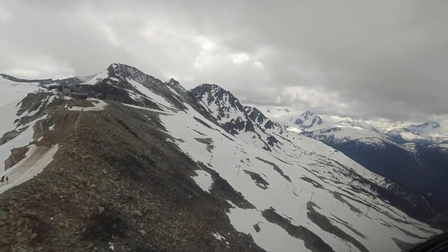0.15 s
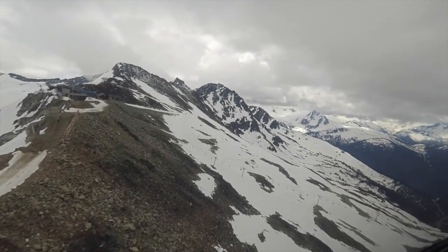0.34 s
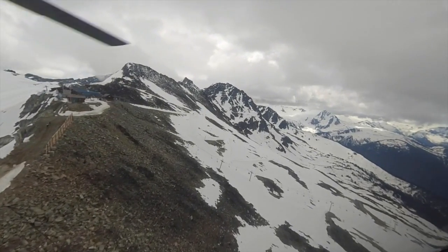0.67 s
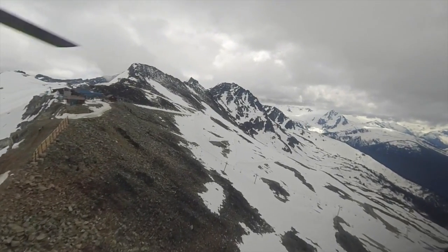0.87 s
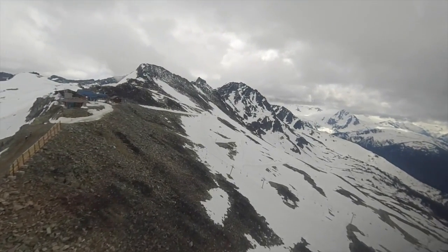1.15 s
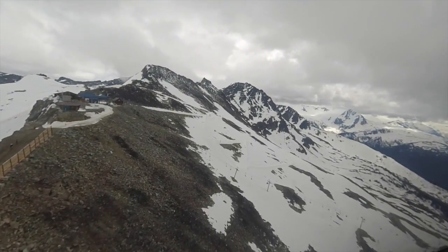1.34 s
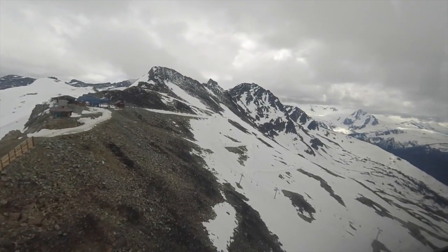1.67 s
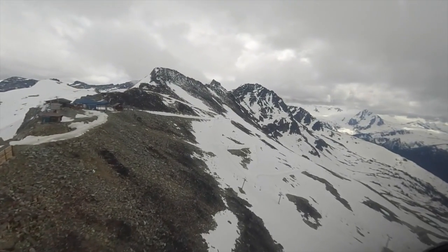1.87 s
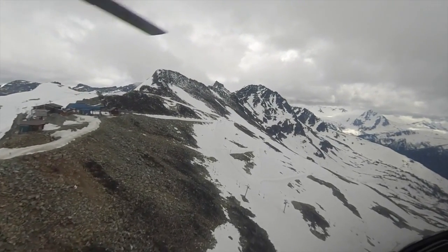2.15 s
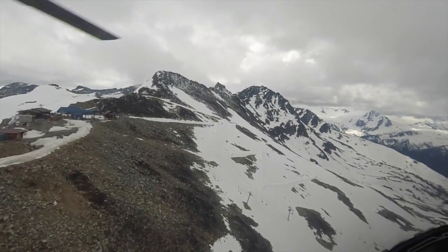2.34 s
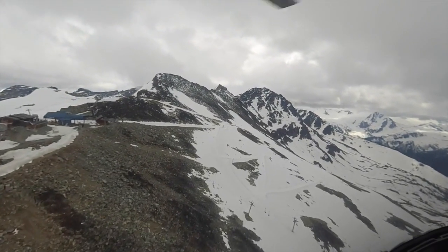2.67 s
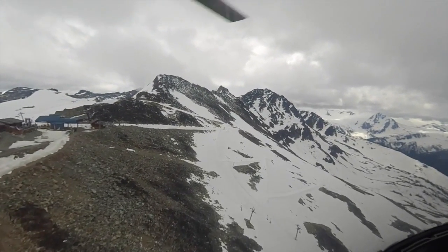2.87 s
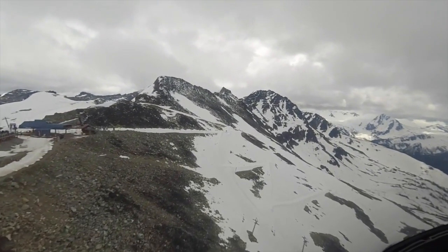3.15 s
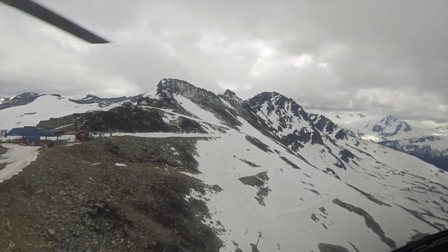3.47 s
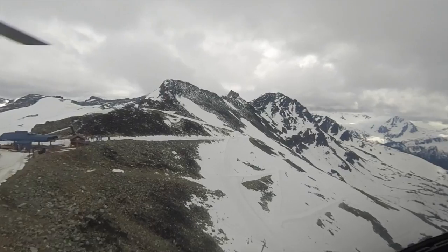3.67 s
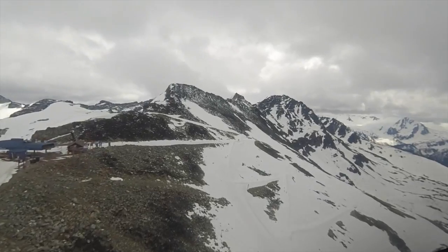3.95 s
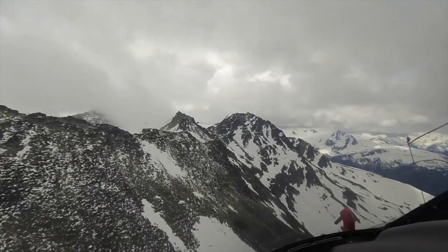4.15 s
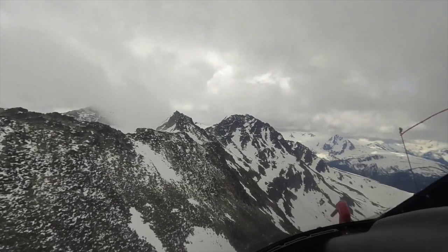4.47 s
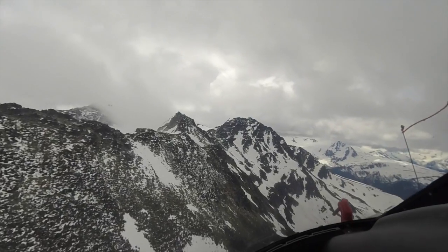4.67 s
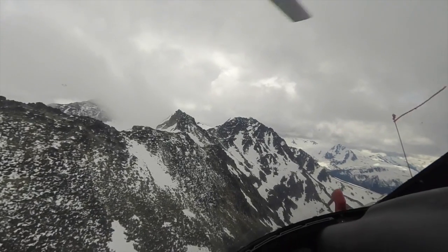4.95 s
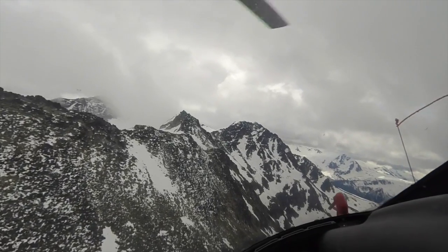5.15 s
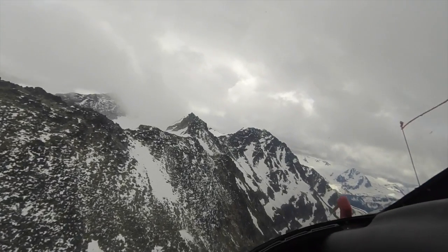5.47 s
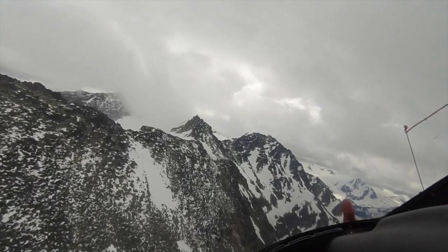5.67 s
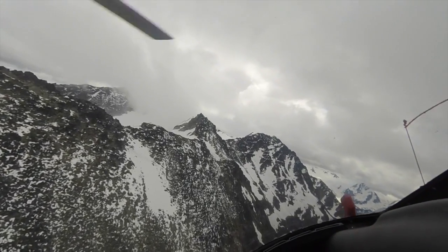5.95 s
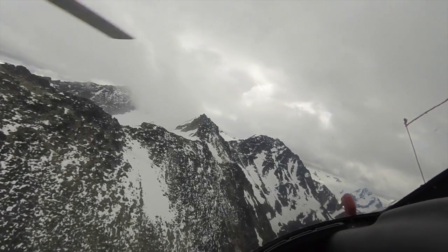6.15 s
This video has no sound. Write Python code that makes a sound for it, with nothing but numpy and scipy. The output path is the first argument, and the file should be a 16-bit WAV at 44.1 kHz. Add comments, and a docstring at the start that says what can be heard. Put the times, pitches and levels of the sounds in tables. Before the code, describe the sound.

A single microphone on a mount in a helicopter cockpit picks up constant bassy rumble, buzzing drone and thin, wavering mechanical whines. A sudden overloaded clack with two quick, weaker rebounds breaks the steadiness, followed by a barely audible high whistle. After a soft edit click the same cabin sounds fuller and more strained: stronger low throbbing, thicker roar and a midrange whine, continuing until the end without fading.

```python
"""Inside a helicopter cabin, cruising over a ridge, one microphone hears the main rotor throb, the tail rotor
drone and the gears whine over a roar of noise coloured by the cabin.
At 1.7 s something knocks hard on the camera mount and bounces twice, overloading the microphone; a faint
thin whistle then swells and sinks.
At 4.1 s an edit with a small click jumps to a later stretch of flight, where the rotor works harder."""
import sys
import numpy as np
from scipy import signal
from scipy.fft import rfft, irfft
from scipy.io import wavfile

SR = 44100
rng = np.random.default_rng(int(sys.argv[2]) if len(sys.argv) > 2 else 0)


def persist_wave(psi):
    """Save psi, clipped to +-1, as 16-bit WAV."""
    counts = np.round(np.clip(psi, -1, 1) * 32767).astype(np.int16)
    wavfile.write(sys.argv[1], SR, np.atleast_2d(counts).T)


N = 277659
TIME = np.arange(N) / SR   # s
CUT_S = 4.1453
LATER = np.clip((TIME - CUT_S) * 1000, 0, 1)   # 0 before the edit, 1 after it, over 1 ms

# Main rotor, three blades. Each row: multiple of the shaft rate, level before the edit in dB, after it in dB.
MAIN_ROTOR = [(1, -44.5, -56), (3, -32.5, -24.5), (6, -43.5, -38), (9, -50.5, -49.5), (12, -55, -60),
              (15, -56.5, -53), (18, -56, -54)]
# Tail rotor. Each row: multiple of the blade rate, level before the edit in dB, after it in dB.
TAIL_ROTOR = [(1, -37, -37.5), (2, -42, -41.5), (3, -45.5, -47.5), (4, -67.5, -75.5), (5, -66.5, -97)]
# Pitch of the fast input gear, pacing the whole drive train. Each row: time in seconds, pitch in Hz.
INPUT_GEAR_PITCH = [(0, 1733.9), (1.1, 1733.2), (2.2, 1728.1), (4.1, 1732.9), (4.2, 1739.2), (5.15, 1744.5),
                    (6.3, 1738.3)]
# Whine of the input gear. Each row: time in seconds, level in dB.
INPUT_GEAR_LEVEL = [(0.0, -55.0), (1.2, -53.5), (1.3, -62.5), (1.4, -63.5), (1.6, -52.5), (3.5, -55),
                    (3.8, -49.5), (4.1, -58.5), (5.1, -49), (5.2, -52.5), (6.3, -51.0)]
# Gear mesh harmonics that swell and fade slowly. Each row: multiple of the mesh rate, level before the edit
# in dB, after it in dB, swing in dB, period in seconds, time of a crest in seconds.
MESH_HARMONICS = [(1, -54.5, -55.5, .5, 1.21, 0.71), (4, -71.5, -64.5, 4, 4.25, 3.46),
                  (6, -71, -73.5, 3.5, 1.75, 1.36)]
# Second mesh harmonic. Each row: time in seconds, level in dB.
OCTAVE_LEVEL = [(0, -53.5), (0.45, -60.0), (1.0, -69), (1.9, -66.5), (2.25, -54), (3.05, -59), (3.4, -67),
                (4.0, -63.5), (4.2, -53.5), (4.8, -57), (5.15, -65), (5.8, -57), (6.3, -56.5)]
# Fifth mesh harmonic, the shrill one. Each row: time in seconds, level in dB.
SHRILL_LEVEL = [(0.0, -56.5), (0.8, -65.5), (1.3, -62.5), (1.4, -87), (1.6, -62.5), (2.0, -67.5),
                (2.2, -59.5), (2.7, -64.5), (3.9, -59), (4.1, -72), (4.7, -66), (5.8, -77), (6.3, -62)]
# Faint gear and turbine tones. Each row: pitch at cruising speed in Hz, level before the edit in dB,
# after it in dB.
FAINT_TONES = [(707, -66, -67), (1555, -65, -76), (1963.5, -79, -71.5), (3550, -91, -87),
               (4560, -78, -76.5), (5236, -85.5, -86), (5573, -91.5, -101), (5892, -89, -96),
               (6730, -100, -102), (7866, -99, -105), (9100, -101, -105), (10930, -100, -101)]
# Turbine shaft harmonics. Each row: multiple of the shaft rate, level in dB.
TURBINE_HARMONICS = [(11, -96), (13, -100), (15, -96), (17, -99), (21, -101), (23, -101), (25, -103)]
# Turbine whine under load, heard after the edit. Each row: time in seconds, pitch in Hz, level in dB.
LOAD_WHINE = [(4.15, 1034, -49.0), (4.5, 1041, -51.9), (5.2, 1033, -48.1), (5.9, 1027, -52.6),
              (6.3, 1019, -65.1)]
# Knocks on the mount. Each row: time in seconds, signed thump gain, clack in dB, contact softness (low-pass
# corner) in Hz, rattle in dB.
KNOCKS = [(1.71, -1.09, 1, 2340, -14.5), (1.7345, 0.22, -27, 696, -38), (1.7647, 0.43, -11, 900, -35)]
# Slow sway of the mount. One row: pitch in Hz, level in dB, 60 dB decay time in seconds.
MOUNT_SWAY = (144.6, 2.8, 0.053)
# Modes of the housing. Each row: pitch in Hz, level in dB, 60 dB decay time in seconds.
HOUSING_MODES = [(241, -11, 0.053), (397, -30, 0.18), (609.5, -15, 0.093), (775, -11.5, 0.038),
                 (1040, -2, 0.02), (1153, -5.5, 0.015), (1357, -2, 0.012), (2050, -11, 0.0047),
                 (3000, -7, 0.0046)]
# Air and exhaust through the cabin walls. Each row: frequency in Hz, relative density in dB per Hz.
ROAR_SPECTRUM = [(10, 5), (30, -9.5), (52, -10), (100, -9.5), (180, -19), (280, -24), (480, -27.5),
                 (800, -34), (1300, -36.5), (1700, -35), (2200, -48.5), (4300, -47.5), (5100, -60),
                 (7000, -65.5), (14500, -71.5)]
# Cabin air and panel resonances. Each row: centre in Hz, width in Hz, lift before the edit in dB,
# after it in dB.
CABIN_RESONANCES = [(526, 44, -1, 9), (1008, 72, 8, 9), (3315, 174, 8.5, 8), (10770, 1200, 4, 5.5)]
# Extra roar under load, after the edit. Each row: frequency in Hz, lift in dB.
LOAD_LIFT = [(15, 4.5), (50, 3), (110, 4), (500, 1), (1500, 3), (3000, 3), (8000, 2), (14000, 0)]

# Drive train: ratios of the mesh rate to the main shaft and tail blade rates, and of the input gear to it
MESH_PER_TURN, MESH_PER_TAIL_BLADE, WHINE_PER_MESH = 100.6, 9.43, 2.6425
CRUISE_MESH_HZ = 654.5
# Each turn of the main shaft rocks the gear mesh: swing of level (share) and of phase (radians)
TURN_DEPTH, TURN_WOBBLE = 0.059, 0.19
TURBINE_HZ = 576   # shaft rate
# A thin whistle swells once out of its resting level, holds and sinks back
WHISTLE_HZ, WHISTLE_REST_DB, WHISTLE_SWELL_DB = 5202, -89.5, 8.5
WHISTLE_START_S, WHISTLE_ATTACK_S, WHISTLE_HOLD_S, WHISTLE_RELEASE_S = 1.8, .2, 1.0, .35
OVERLOAD_KNEE = 9.7   # the higher, the more abruptly the microphone saturates
CUTOFF_HZ = 15200


def rotors(mesh_hz):
    """Both rotors are geared to the drive train, so their rates follow the mesh."""
    main = rotor(mesh_hz / MESH_PER_TURN, MAIN_ROTOR, flutter=0.062, lag=1.0)
    tail = rotor(mesh_hz / MESH_PER_TAIL_BLADE, TAIL_ROTOR, flutter=0.14, lag=0.5)
    return main + tail


def rotor(rate_hz, harmonics, flutter, lag):
    """Blade passages make pressure pulses with phase-locked harmonics; gusty inflow makes them uneven."""
    phase = 2 * np.pi * np.cumsum(rate_hz) / SR
    pulses = np.zeros(N)
    for k, before_db, after_db in harmonics:
        gusts = 1 + flutter * drift(4.0)
        pulses += from_db(across_cut(before_db, after_db)) * gusts * np.sin(k * phase - lag)
    return np.sqrt(2) * pulses   # table levels are rms


def gearbox(mesh_hz):
    """Meshing teeth give harmonics that rock with each shaft turn, beside fainter tones in step with them."""
    shaft_hz = mesh_hz / MESH_PER_TURN
    turn = np.sin(2 * np.pi * np.cumsum(shaft_hz) / SR)
    rocking_hz = TURN_WOBBLE * shaft_hz * turn
    teeth = tone(2 * mesh_hz, *in_time(OCTAVE_LEVEL), flutter=0.11, flutter_rate=21)
    teeth += tone(5 * mesh_hz, *in_time(SHRILL_LEVEL), flutter=0.12, flutter_rate=28)
    for k, before_db, after_db, *swell in MESH_HARMONICS:
        level_db = across_cut(before_db, after_db) + swell_db(*swell)
        teeth += tone(k * mesh_hz + rocking_hz, level_db, flutter=0.17, flutter_rate=12.4)
    faint = np.zeros(N)
    for cruise_hz, before_db, after_db in FAINT_TONES:
        hz = cruise_hz * mesh_hz / CRUISE_MESH_HZ
        faint += tone(hz, across_cut(before_db, after_db), flutter=0.41, flutter_rate=12.0)
    return teeth * (1 + TURN_DEPTH * turn) + faint


def input_gear(whine_hz):
    """The fast input gear whines on a single fluttering line."""
    return tone(whine_hz, *in_time(INPUT_GEAR_LEVEL), flutter=0.13, flutter_rate=9.2)


def turbine():
    """The gas generator runs at its own speed: high shaft harmonics, a whistle, and a whine under load."""
    shaft_hz = np.full(N, TURBINE_HZ)
    stack = np.zeros(N)
    for k, level_db in TURBINE_HARMONICS:
        stack += tone(k * shaft_hz, level_db, flutter=.3, flutter_rate=8)
    corners_s = np.cumsum([WHISTLE_START_S, WHISTLE_ATTACK_S, WHISTLE_HOLD_S, WHISTLE_RELEASE_S])
    whistle_db = WHISTLE_REST_DB + WHISTLE_SWELL_DB * np.interp(TIME, corners_s, [0, 1, 1, 0])
    whistle = tone(np.full(N, WHISTLE_HZ), whistle_db, flutter=.25, flutter_rate=13)
    loaded = tone(*in_time(LOAD_WHINE), flutter=0.055, flutter_rate=21)
    return stack + (1 - LATER) * whistle + LATER * loaded


def knocks(chatter_db, rattle_t60, rattle_hz):
    """A hard blow and two rebounds rock the mount and ring the housing, whose loose parts chatter briefly."""
    push, contact, rattle = np.zeros((3, N))
    for s, thump, clack_db, soft_hz, rattle_db in KNOCKS:
        click = signal.unit_impulse(N, round(s * SR)) + 1e-18
        dying = (TIME > s) * from_db(-np.minimum(60 * np.abs(TIME - s) / rattle_t60, 200))
        # sparse random taps, on about one sample in ten
        chatter = rng.standard_normal(N) * (rng.random(N) < .1) * dying
        softness = signal.butter(2, soft_hz, fs=SR, output="sos")
        push += thump * signal.sosfilt(softness, click)
        contact += from_db(clack_db) * signal.sosfilt(softness, click + from_db(chatter_db) * chatter)
        rattle += from_db(rattle_db) * chatter
    sway_hz, sway_db, sway_t60 = MOUNT_SWAY
    sway = from_db(sway_db) * ring(push, sway_hz, sway_t60)
    clack = sum(from_db(level_db) * ring(contact, hz, t60) for hz, level_db, t60 in HOUSING_MODES)
    # the chatter also reaches the microphone directly, as a rattle low-passed at rattle_hz
    direct = signal.sosfilt(signal.butter(1, rattle_hz, fs=SR, output="sos"), rattle)
    return sway + clack + direct


def splice(step_db, settle_s):
    """The pressure jumps at the edit and settles exponentially: a small click."""
    age = TIME - CUT_S
    return from_db(step_db) * (age > 0) * np.exp(-np.abs(age) / settle_s)


def roar(mesh_hz, level_db, throb):
    """Turbulence coloured by the cabin, swelling a little at each main blade passage."""
    hz = np.arange(N // 2 + 1) * SR / N
    white = rfft(rng.standard_normal(N)) * np.sqrt(SR / 2)   # unit power per Hz
    air = white * from_db(level_db + at_hz(ROAR_SPECTRUM, hz))
    cruise_db, load_db = np.zeros((2, len(hz)))
    for centre_hz, width_hz, before_db, after_db in CABIN_RESONANCES:
        resonance = 1 / (1 + (2 * (hz - centre_hz) / width_hz) ** 2)
        cruise_db += before_db * resonance
        load_db += after_db * resonance
    load_db += at_hz(LOAD_LIFT, hz)
    noise = across_cut(irfft(air * from_db(cruise_db), N), irfft(air * from_db(load_db), N))
    blade_phase = 3 * 2 * np.pi * np.cumsum(mesh_hz / MESH_PER_TURN) / SR   # three blades a turn
    return noise * (1 + throb * np.sin(blade_phase)) * from_db(0.11 * drift(3.6))


def tone(hz, level_db, flutter, flutter_rate):
    """A line of given rms level whose strength and phase flutter."""
    phase = 2 * np.pi * (np.cumsum(hz) / SR + rng.random())
    steady = (1 + flutter * drift(flutter_rate)) * np.sin(phase)
    quadrature = flutter * drift(flutter_rate) * np.cos(phase)
    return from_db(level_db) * (steady + quadrature) * np.sqrt(2 / (1 + 2 * flutter ** 2))


def ring(force, hz, t60):
    """A damped mode: a unit click sets a sine of height 1 ringing."""
    r, w = np.exp(-np.log(1000) / (t60 * SR)), 2 * np.pi * hz / SR
    return signal.lfilter([0, np.sin(w)], [1, -2 * r * np.cos(w), r * r], force + 1e-18)


def drift(rate):
    """Slow chance of spread 1: noise through two equal low-pass poles at rate Hz."""
    step = 40   # samples between drawn points
    r = np.exp(-2 * np.pi * rate * step / SR)
    draws = rng.standard_normal(N // step + 2002)
    slow = signal.lfilter([1], [1, -2 * r, r * r], draws)[2000:]   # drop the filter's start-up
    return np.interp(np.arange(N) / step, np.arange(len(slow)), slow / slow.std())


def swell_db(swing_db, period_s, crest_s):
    """A slow, regular rise and fall of level."""
    return swing_db * np.cos(2 * np.pi * (TIME - crest_s) / period_s)


def across_cut(before, after):
    """One value up to the edit, another from there on."""
    return before + (after - before) * LATER


def in_time(rows):
    """Each column of a curve, at every sample."""
    s, *columns = np.transpose(rows)
    return [np.interp(TIME, s, column) for column in columns]


def at_hz(points, hz):
    """A spectrum read on a log-frequency axis."""
    f, level = np.transpose(points)
    return np.interp(np.log(hz + 1e-9), np.log(f), level)


def from_db(db):
    """Decibels to gain."""
    return 10 ** (np.asarray(db) / 20)


def scene():
    """Everything reaches one microphone, alike in both channels."""
    whine_hz, = in_time(INPUT_GEAR_PITCH)
    mesh_hz = whine_hz / WHINE_PER_MESH
    machinery = rotors(mesh_hz) + gearbox(mesh_hz) + input_gear(whine_hz) + turbine()
    blows = knocks(chatter_db=-16, rattle_t60=0.03, rattle_hz=4500)
    click = splice(step_db=-21.5, settle_s=0.0069)
    air = roar(mesh_hz, level_db=-51.5, throb=0.052)
    return np.tile(machinery + blows + click + air, (2, 1))


def record(dry):
    """The microphone saturates at full scale; a steep low-pass then cuts the top."""
    saturated = dry / (1 + np.abs(dry) ** OVERLOAD_KNEE) ** (1 / OVERLOAD_KNEE)
    return signal.sosfilt(signal.ellip(10, .1, 80, CUTOFF_HZ, fs=SR, output="sos"), saturated)


dry = scene()
out = record(dry)
persist_wave(out)
```